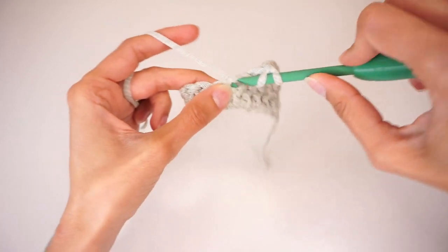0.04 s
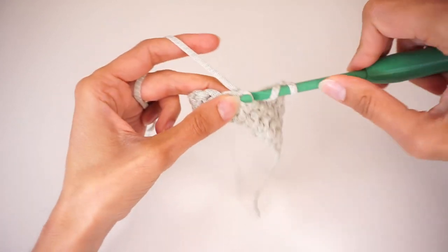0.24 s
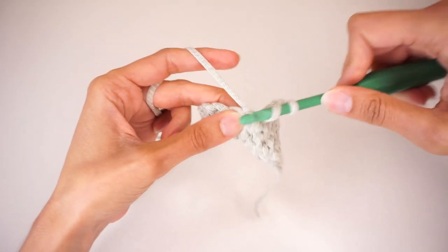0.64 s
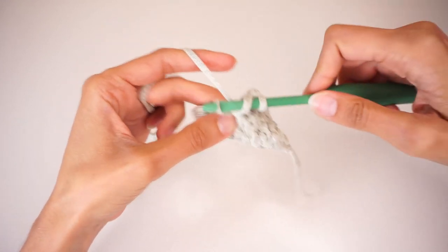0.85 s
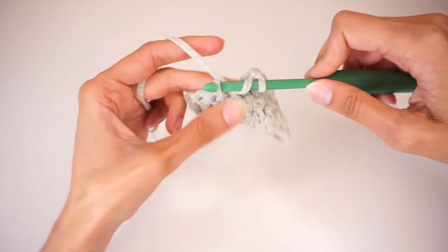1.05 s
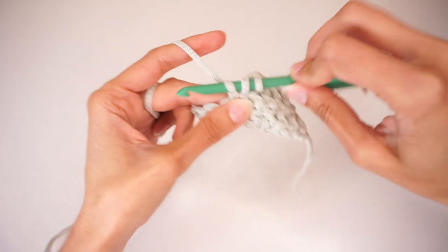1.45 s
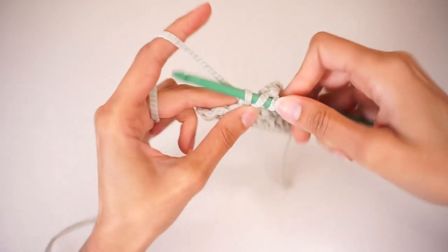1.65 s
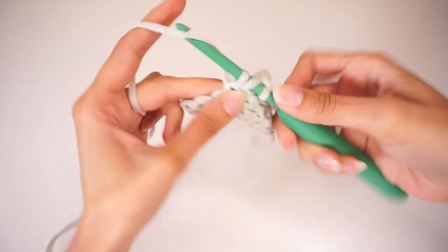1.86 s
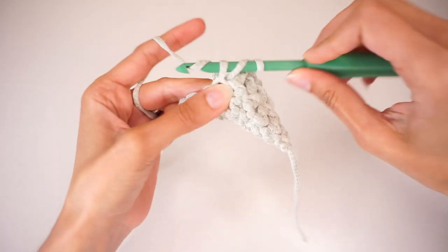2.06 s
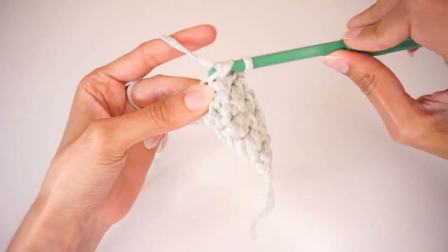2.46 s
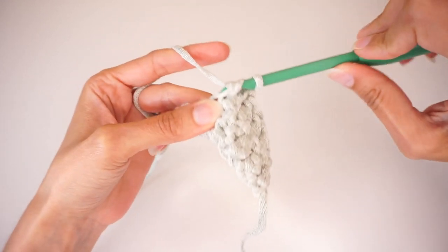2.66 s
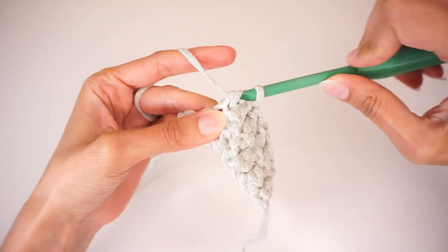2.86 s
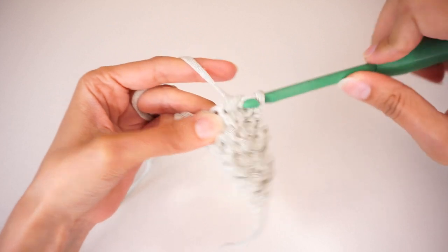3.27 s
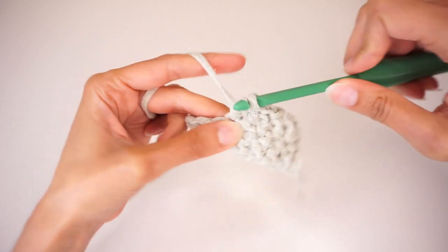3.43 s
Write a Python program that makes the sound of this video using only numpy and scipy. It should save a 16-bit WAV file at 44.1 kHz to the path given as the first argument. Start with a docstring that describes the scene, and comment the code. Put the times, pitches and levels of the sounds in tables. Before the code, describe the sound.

Yarn rubs on a crochet hook in soft, hissy strokes, close by in a quiet room. A bird chirps faintly at the start, and the hook clicks lightly near 0.4 and 0.5 seconds. A muffled engine outside climbs in pitch, loudest from 1.5 to 2.4 seconds as the strokes strengthen. Just after 3 seconds, a tug brings two soft, deep thumps, snagging fibres and a brief, faint squeak.

```python
"""Crocheting cotton yarn in a quiet room, close to the microphone, slightly right.
A faint bird chirps over the first soft strokes of fibre on hook. Near 0.4 and 0.5 s the hook clicks
against a nail or ring. An engine outside, only a hum through the walls, climbs in pitch throughout
and is loudest from 1.5 to 2.4 s, as the strokes grow stronger. Just after 3 s the hands tug the stitch
tight: two deep thumps, snagging fibres and a brief squeak."""
import sys
import numpy as np
from scipy import signal
from scipy.fft import rfft, irfft
from scipy.io import wavfile
from scipy.ndimage import uniform_filter1d

SR = 44100
rng = np.random.default_rng(int(sys.argv[2]) if len(sys.argv) > 2 else 0)


def generate_wav(signal):
    """Clip the signal to [-1, 1] and save it as 16-bit WAV at the path in sys.argv[1]."""
    frames = np.transpose(np.atleast_2d(signal))
    scaled = np.clip(frames, -1, 1) * 32767
    pcm = np.round(scaled).astype(np.int16)
    wavfile.write(sys.argv[1], SR, pcm)


N = 154350

# room tone with microphone hiss; road rumble (frequency [Hz], relative density [dB])
TONE_SPECTRUM = [(20, -2.5), (45, -5), (200, -16.5), (640, -20.5), (900, -22.5), (1900, -25), (3000, -28.5),
                 (10000, -31.5), (13000, -31.5), (16000, -34)]
RUMBLE_SPECTRUM = [(25, -4.5), (60, 6), (110, -2.5), (180, 0), (280, -6.5), (420, -24), (650, -14.5),
                   (1200, -41)]
# road rumble envelope (time [s], level [dB])
RUMBLE_DB = [(0, -61), (2.1, -52), (3.5, -58)]
# background stereo image (frequency [Hz], left-right correlation [-])
BACKGROUND_CORRELATION = [(30, 0.92), (130, 0.89), (220, 0.42), (400, -0.14), (700, -0.38), (1500, -0.41),
                          (16000, 0.058)]
# engine firing rate (time [s], rate [Hz])
FIRING_HZ = [(0, 53.56), (.3, 58.9), (.6, 62.67), (1.0, 68.74), (1.44, 73.73), (1.75, 77.9), (2.22, 84.65),
             (2.4, 85.66), (2.72, 86.16), (2.92, 95.6), (3.2, 99.9), (3.5, 101.6)]
# engine harmonics 1, 2, 3 (time [s], level [dB])
FUNDAMENTAL_DB = [(0, -71), (.25, -51), (.68, -47), (.8, -42), (1.0, -42), (1.1, -48), (1.28, -46.5),
                  (1.46, -36), (1.62, -42), (2.1, -46), (2.4, -54), (2.8, -62), (3.5, -60)]
SECOND_DB = [(0, -77), (.4, -73), (.6, -53), (1.0, -64), (1.22, -50), (1.55, -56), (1.85, -46),
             (2.0, -47.5), (2.18, -37.5), (2.38, -40), (2.6, -49), (2.85, -64.5), (3.17, -59.5),
             (3.35, -76)]
THIRD_DB = [(0, -78.5), (2.5, -70.5), (2.9, -83), (3.28, -64.5), (3.5, -83)]
# bird notes (start [s], length [s], start pitch [Hz], end pitch [Hz], level [dB])
BIRD_NOTES = [(-.02, 0.044, 3450, 3250, -64), (0.152, 0.099, 2866, 2996, -68.5),
              (0.241, 0.022, 3300, 3370, -60.5)]
# hand tugs (time [s], level [dB])
TUGS = [(3.05, -45), (3.17, -44.5)]
# hook resonances under tight yarn (frequency [Hz], level [dB])
RUBBED_MODES = [(1820, -71), (3350, -63.5), (4750, -66.5), (7150, -66.5)]
# hook contacts (time [s], gain [dB], treble tilt [dB/octave])
CONTACTS = [(0.374, -7, -5), (0.3902, -8, 0.5), (0.5198, 2.5, 0.4), (0.5446, -10, -6)]
# struck hook resonances (frequency [Hz], relative level [dB])
STRUCK_MODES = [(1200, -6.5), (1780, 7), (2040, -1), (2466, -6), (3480, 0), (4250, 4.5), (4500, 4),
                (6480, 4), (6880, 7), (8300, 0)]
# contact chatter (frequency [Hz], relative density [dB])
CHATTER_SPECTRUM = [(900, -26), (1350, 4.5), (5400, -2.5), (10000, 2), (16000, 1.5)]
# yarn sliding on the hook (start [s], length [s], level [dB], rise [dB], body re sheen [dB])
YARN_STROKES = [(0.0, 0.08, -63.5, -9, 8.5), (0.133, 0.059, -61.5, 0, 7.5), (0.702, 0.08, -58, 0, 1.5),
                (0.936, 0.058, -56, -4, -7), (1.055, 0.021, -59.5, 0, -7), (1.253, 0.12, -62.5, 6, 2.5),
                (1.354, 0.22, -53.5, 5.5, 2.5), (1.638, 0.065, -59, 0, 4.5), (1.724, 0.15, -63, -1, 3),
                (1.87, 0.067, -56, 4, 5), (1.947, 0.12, -49.5, 0, 3.5), (2.087, 0.13, -49.5, 4.5, 2),
                (2.25, 0.034, -60, -15, 0.5), (2.386, 0.069, -59.5, 7, 0.5), (3.161, 0.058, -47.5, -3, -5),
                (3.32, 0.021, -57.5, 2, 3.5)]
# fibres catching and letting go (time [s], level [dB], decay [s], body re sheen [dB])
FIBRE_SNAGS = [(2.041, -44, .004, 1), (2.0643, -37.5, 0.0024, -7), (3.146, -37.5, 0.0067, -0.5),
               (3.171, -43, 0.0092, -8)]
# yarn friction (frequency [Hz], relative density [dB])
YARN_SPECTRUM = [(900, -13.5), (2050, -6), (3100, -7.5), (4150, -2.5), (4900, -3.5), (5600, -9), (7300, -2),
                 (9100, -5.5), (10350, 2), (11100, 1), (12400, -0.5), (14400, 1), (16000, 0)]
# yarn position (frequency [Hz], left minus right [dB])
YARN_PAN_DB = [(1500, 2.5), (4500, -2.5), (9000, -4), (15000, -10)]

YARN_CORRELATION = 0.051
LOW_CUT_HZ, TOP_HZ = 28, 15800


def undb(db):
    """Decibels to gain."""
    return 10 ** (np.asarray(db) / 20)


def times():
    """Sample times [s]."""
    return np.arange(N) / SR


def curve(points):
    """Linear envelope through (time [s], value) points."""
    return np.interp(times(), *np.array(points).T)


def per_bin(points):
    """(frequency [Hz], value) points interpolated onto FFT bins, log axis."""
    hz, value = np.array(points).T
    return np.interp(np.log(np.arange(N // 2 + 1) * SR / N + 1), np.log(hz), value)


def unit(x):
    """Scale to rms 1."""
    return x / np.sqrt(np.mean(x ** 2))


def colour(x, spectrum):
    """Apply a spectrum; rms 1."""
    return unit(irfft(rfft(x) * undb(per_bin(spectrum)), N))


def pan(db):
    """Channel gains for a left-minus-right level."""
    return undb(np.array([[1], [-1]]) * db / 2)


def stereo(pair, correlation, pan_db):
    """Mix two independent signals to a given left-right correlation."""
    mid, side = rfft(pair)
    channels = mid * np.sqrt(1 + correlation) + np.array([[1], [-1]]) * side * np.sqrt(1 - correlation)
    return irfft(channels * pan(pan_db), N)


def wander(rate_hz):
    """Smooth random drift, rms 1."""
    hold = max(int(SR / rate_hz), 1)
    steps = rng.standard_normal(N)[np.arange(N) // hold]
    return unit(uniform_filter1d(uniform_filter1d(steps, hold), hold))


def room(x, wet_db, t60_s=.27):
    """Add a short diffuse tail."""
    t = times()
    tail = rng.standard_normal((2, N)) * np.exp(-np.log(1000) * t / t60_s) * np.minimum(t / 0.0026, 1)
    tail /= np.sqrt(np.sum(tail ** 2) / 2)
    return x + undb(wet_db) * signal.fftconvolve(x, tail, axes=1)[:, :N]


def background(tone_db=-54.5):
    """Room tone, hiss and road rumble that grows as the engine comes; bass nearly mono."""
    correlation = per_bin(BACKGROUND_CORRELATION)
    tone = colour(stereo(rng.standard_normal((2, N)), correlation, pan_db=-0.4), TONE_SPECTRUM)
    road_noise = stereo(rng.standard_normal((2, N)), correlation, pan_db=0)
    road = colour(road_noise, RUMBLE_SPECTRUM + [(TOP_HZ, -90)])
    return undb(tone_db) * tone + undb(curve(RUMBLE_DB)) * road


def engine(waver_db=0.57, lope_re_rumble_db=-6):
    """Accelerating engine: only the lowest orders pass the walls, swelling at room resonances."""
    firing_hz = curve(FIRING_HZ) * (1 + 0.0028 * wander(12))
    phase = 2 * np.pi * np.cumsum(firing_hz) / SR
    hum = sum(undb(curve(levels) + waver_db * wander(13)) * np.sin(harmonic * phase)
              for harmonic, levels in enumerate((FUNDAMENTAL_DB, SECOND_DB, THIRD_DB), 1))
    lope = undb(curve(RUMBLE_DB) + lope_re_rumble_db + 2.4 * wander(6.1)) * np.sin(phase / 2)
    return np.sqrt(2) * (hum + lope)


def bird(pitch_waver=0.028):
    """Thin, nearly pure notes with a slight glide."""
    t, notes = times(), 0
    for start_s, length_s, from_hz, to_hz, db in BIRD_NOTES:
        progress = np.clip((t - start_s) / length_s, 0, 1)
        hz = (from_hz + (to_hz - from_hz) * progress) * (1 + pitch_waver * wander(900))
        swell = undb(db) * np.sqrt(2) * np.sin(np.pi * progress)
        notes += swell * np.sin(2 * np.pi * np.cumsum(hz) / SR)
    return notes * pan(db=2.5)


def hand_tugs(thump_hz=58, half_width_s=.028):
    """Soft, deep thumps as the hands pull the stitch tight."""
    t, thumps = times(), 0
    for time_s, db in TUGS:
        swell = undb(db) * np.exp(-((t - time_s) / half_width_s) ** 2)
        thumps += swell * np.sin(2 * np.pi * (thump_hz * t + rng.random()))
    return thumps


def hook_squeak(start_s=3.165, length_s=0.062, bandwidth_hz=110):
    """A tight loop, pulled through, excites narrow resonances of the hook."""
    swell = np.sin(np.pi * np.clip((times() - start_s) / length_s, 0, 1))
    drag = rng.standard_normal((2, N))
    ring = sum(undb(db) * unit(signal.lfilter(*signal.iirpeak(hz, hz / bandwidth_hz, fs=SR), drag))
               for hz, db in RUBBED_MODES)
    return swell * stereo(ring, YARN_CORRELATION, per_bin(YARN_PAN_DB))


def hook_clicks():
    """Hook on a nail or ring: a sharp snap, then chatter driving a short, hollow resonance."""
    snap_gain, chatter_gain, ring_db = undb(-18), undb(-38), -42
    chatter_hold_s, chatter_decay_s = .003, .0015
    ring_build_s, lowest_t60_s, damping_exponent = 0.0029, .014, .8
    lowest_hz = STRUCK_MODES[0][0]
    octaves = np.log2(np.maximum(np.arange(N // 2 + 1) * SR / N / lowest_hz, 1))
    age_s = times()[:SR // 10]
    free_s = np.maximum(age_s - chatter_hold_s, 0)
    clicks = np.zeros((2, N))
    for start_s, db, tilt_db in CONTACTS:
        ring = 0
        for hz, mode_db in STRUCK_MODES:
            t60_s = lowest_t60_s * (lowest_hz / hz) ** damping_exponent
            envelope = undb(ring_db + mode_db - 60 * free_s / t60_s)
            ring += envelope * np.sin(2 * np.pi * (hz * age_s + rng.random((2, 1))))
        chatter = colour(rng.standard_normal((2, N)), CHATTER_SPECTRUM)[:, :len(age_s)]
        chatter *= np.exp(-free_s / chatter_decay_s)
        hit = ring * (1 - np.exp(-age_s / ring_build_s)) + chatter_gain * chatter
        hit[:, :2] += snap_gain * np.array([.5, -.5])
        placed = np.roll(np.pad(hit, ((0, 0), (0, N - len(age_s)))), int(start_s * SR), axis=1)
        clicks += irfft(rfft(placed) * undb(db + tilt_db * octaves), N)
    return clicks * pan(db=-6)


def fibre_friction(slips_per_s=2200, spread_db=3.0, slip_share=.4):
    """Fine hiss thick with tiny fibre slips; rms 1."""
    slips = (rng.random((2, N)) < slips_per_s / SR) * rng.standard_normal((2, N))
    slips *= undb(spread_db * np.minimum(rng.exponential(size=(2, N)), 4))
    friction = np.sqrt(slip_share) * unit(slips) + np.sqrt(1 - slip_share) * rng.standard_normal((2, N))
    return colour(stereo(friction, YARN_CORRELATION, per_bin(YARN_PAN_DB)), YARN_SPECTRUM)


def yarn_rub(max_attack_s=0.031, max_release_s=0.062, crossover_hz=6300, flicker_db=0.5):
    """Fibres drag and snag on the hook: high sheen over a lower body, balanced stroke by stroke."""
    t, forces = times(), []
    for start_s, length_s, db, rise_db, body_db in YARN_STROKES:
        age_s = t - start_s
        progress = np.clip(age_s / length_s, 0, 1)
        attack = np.clip(age_s / min(max_attack_s, 0.52 * length_s) + .5, 0, 1)
        release = np.exp(-np.maximum(age_s - length_s, 0) / min(max_release_s, length_s / 2))
        forces.append((attack * release * undb(db + rise_db * (progress - .5)), body_db))
    for start_s, db, decay_s, body_db in FIBRE_SNAGS:
        decay = (t >= start_s) * np.exp(-np.abs(t - start_s) / decay_s)
        forces.append((decay * undb(db), body_db))
    sheen_power = sum(force ** 2 for force, _ in forces)
    body_power = sum((force * undb(body_db)) ** 2 for force, body_db in forces)
    friction = fibre_friction()
    body = signal.sosfiltfilt(signal.butter(2, crossover_hz, fs=SR, output="sos"), friction)
    sheen = friction - body
    return (body * np.sqrt(body_power) + sheen * np.sqrt(sheen_power)) * undb(flicker_db * wander(70))


def scene():
    """Close handwork over room tone and sounds from outside."""
    yarn = room(yarn_rub() + hook_squeak(), wet_db=-10)
    handwork = yarn + room(hook_clicks(), wet_db=-13.5) + hand_tugs()
    return handwork + room(bird(), wet_db=6) + engine() + background()


def record(dry):
    """Recorder band limits: gentle low cut, steep top cut."""
    thinned = signal.sosfilt(signal.butter(1, LOW_CUT_HZ, "high", fs=SR, output="sos"), dry)
    return signal.sosfilt(signal.ellip(10, .2, 80, TOP_HZ, fs=SR, output="sos"), thinned)


dry = scene()
out = record(dry)
generate_wav(out)
```